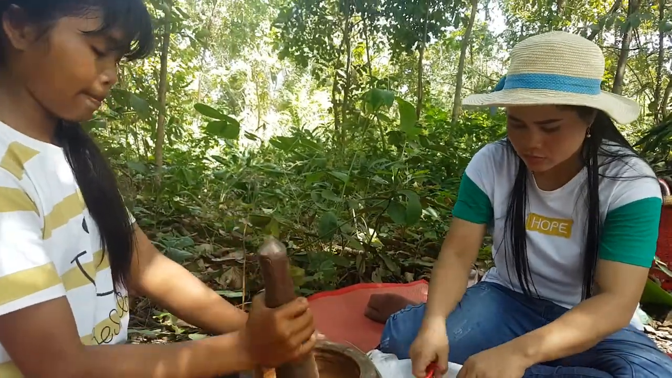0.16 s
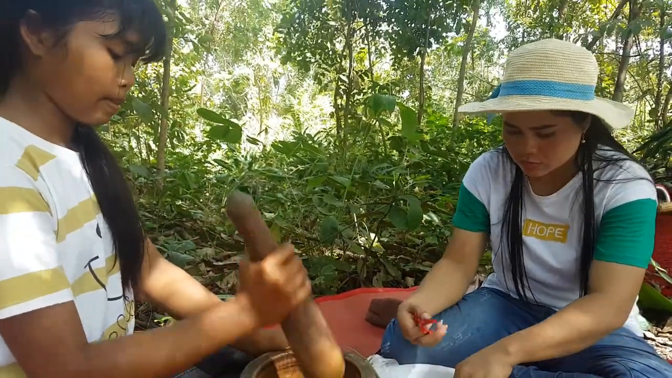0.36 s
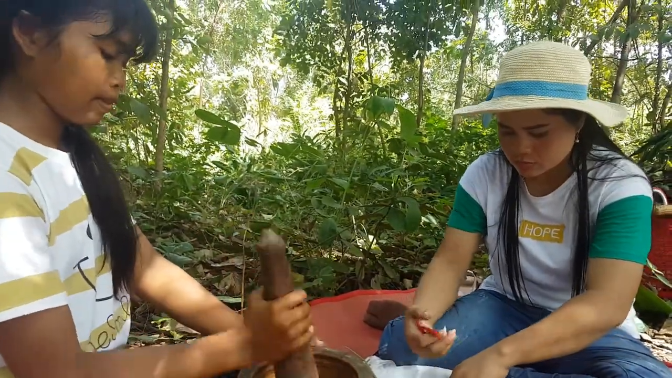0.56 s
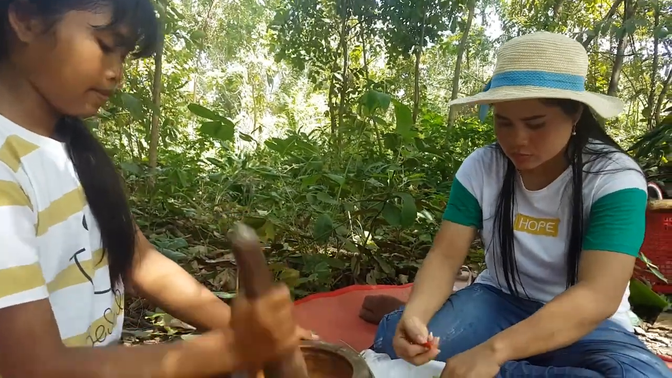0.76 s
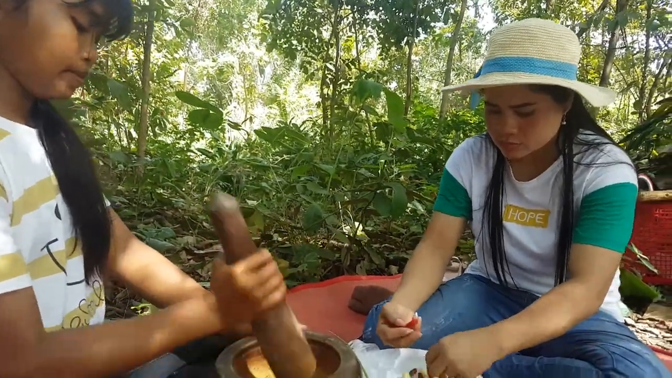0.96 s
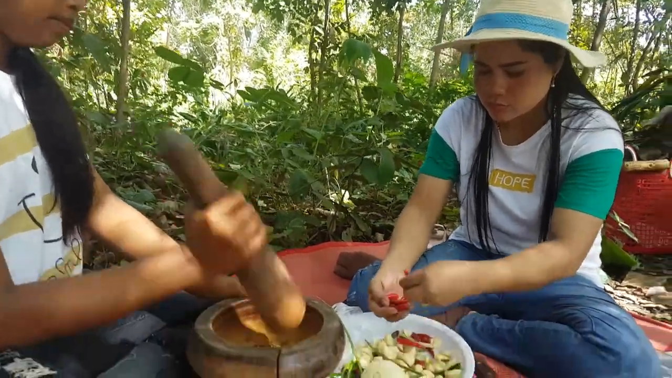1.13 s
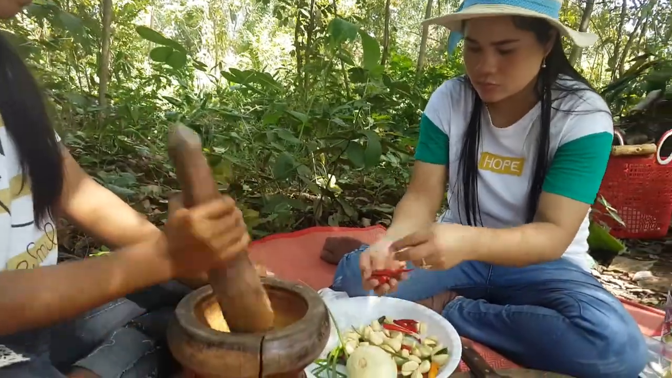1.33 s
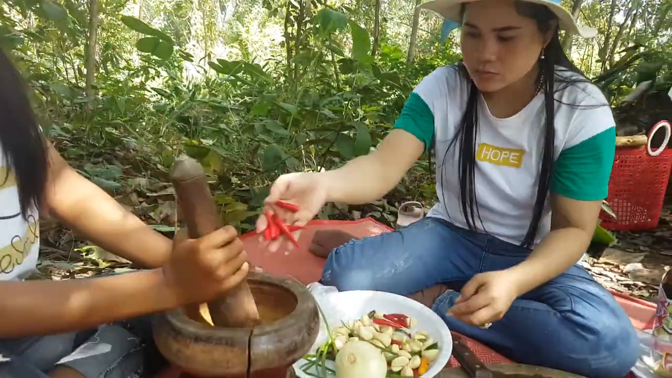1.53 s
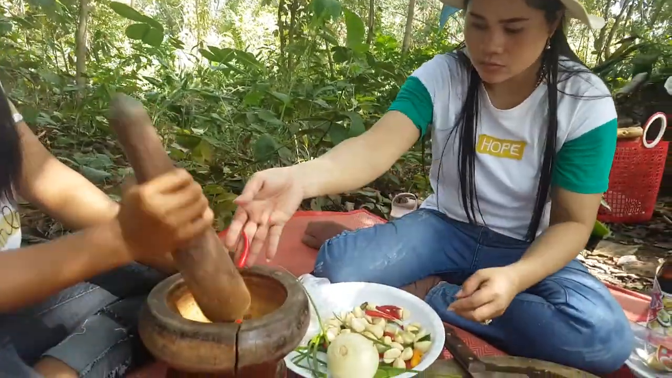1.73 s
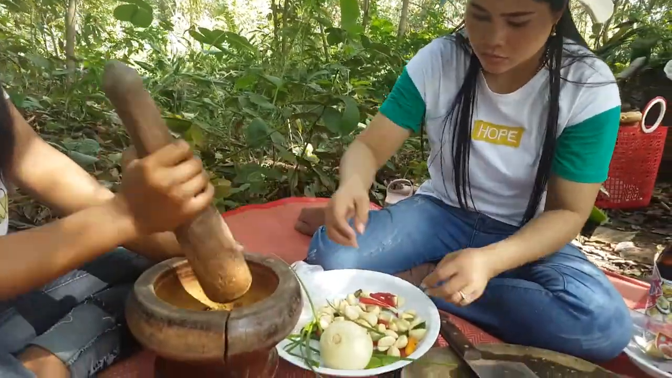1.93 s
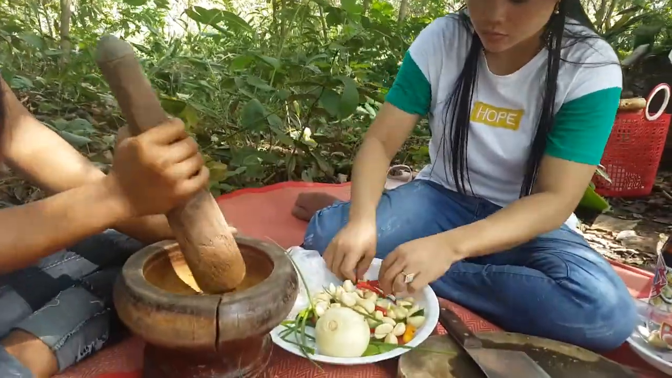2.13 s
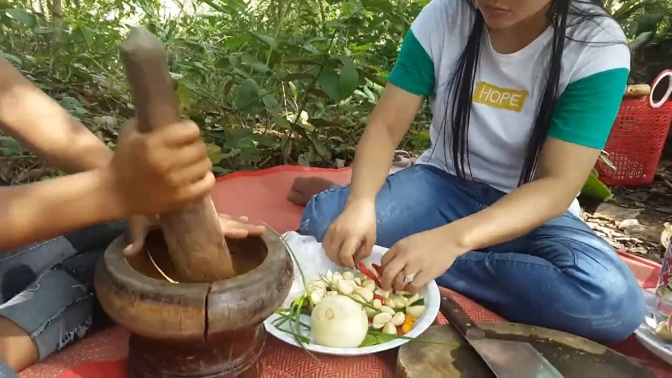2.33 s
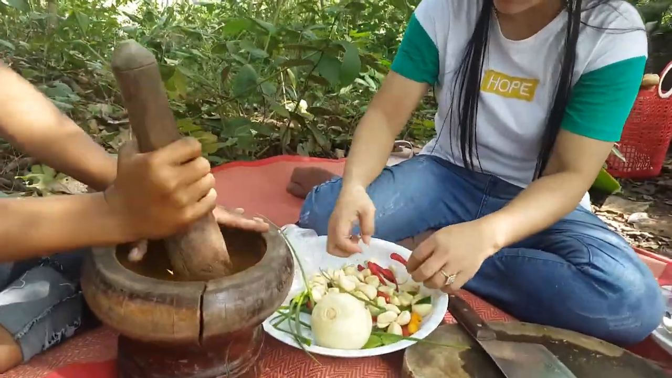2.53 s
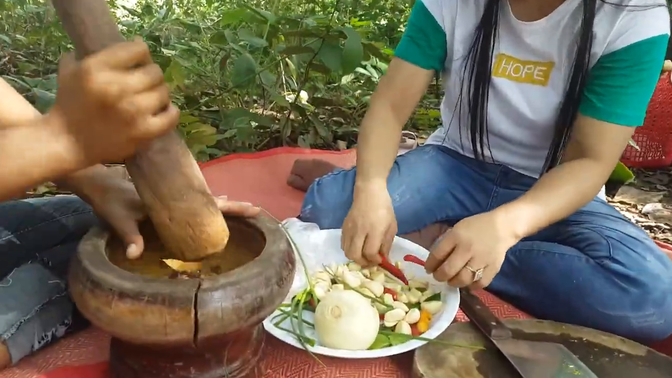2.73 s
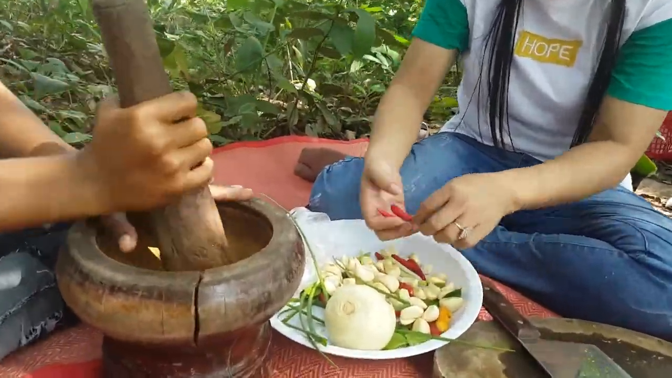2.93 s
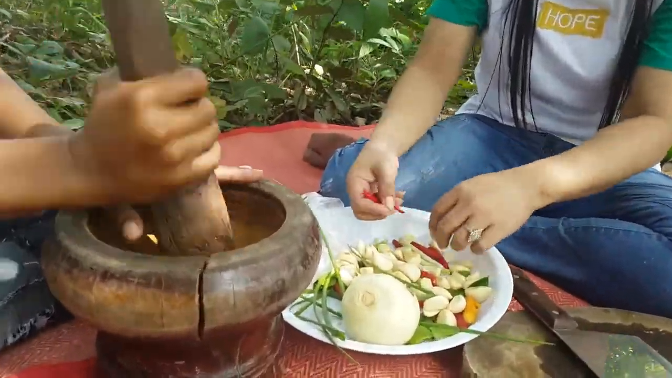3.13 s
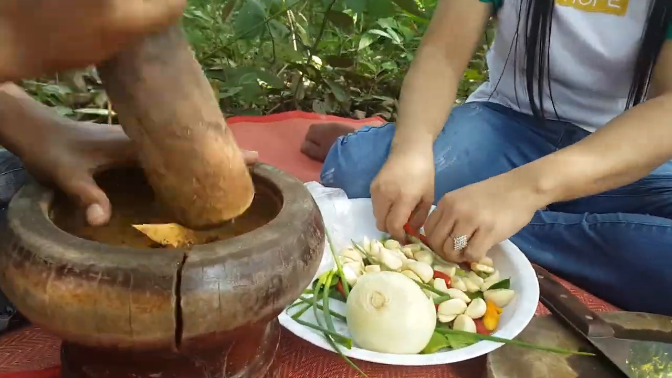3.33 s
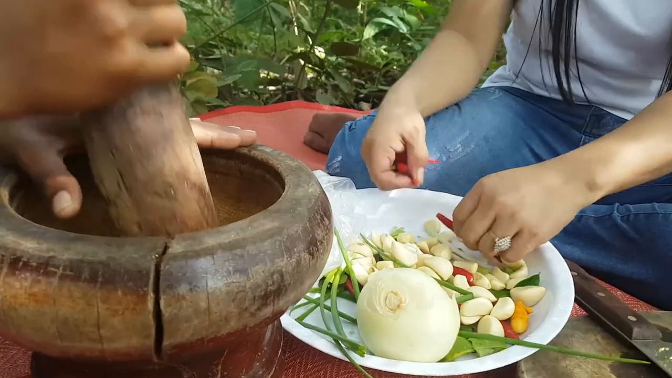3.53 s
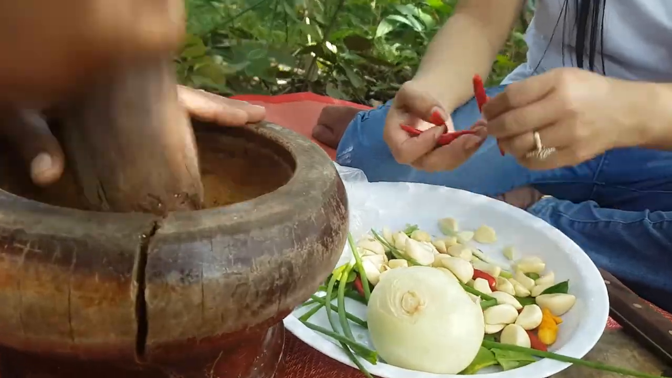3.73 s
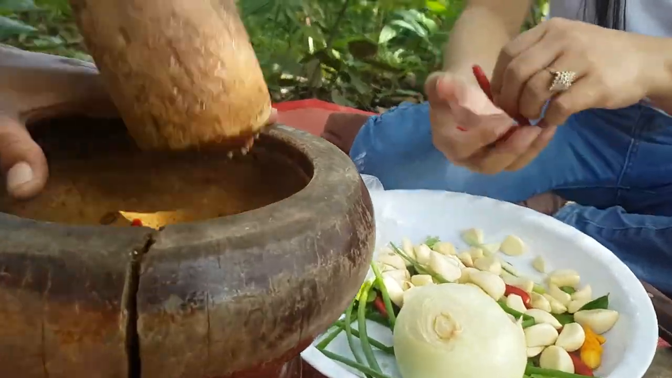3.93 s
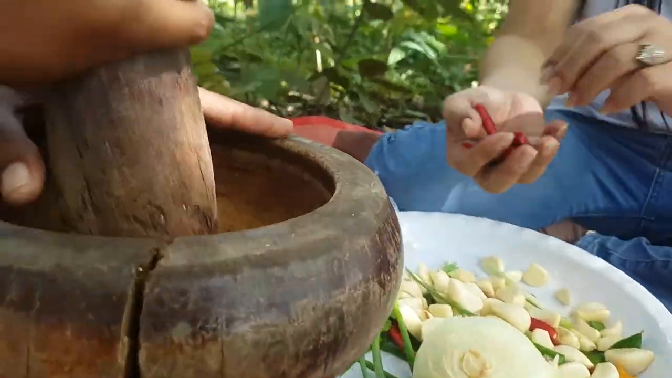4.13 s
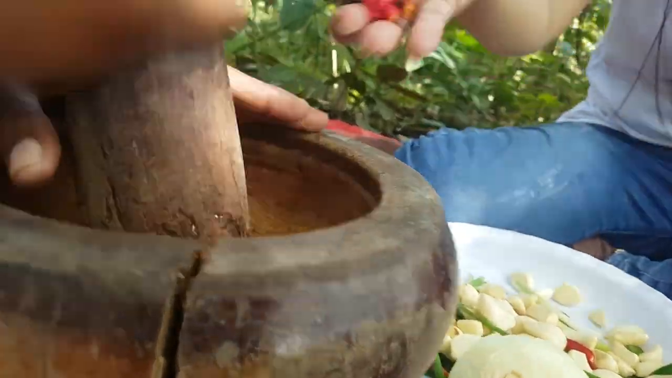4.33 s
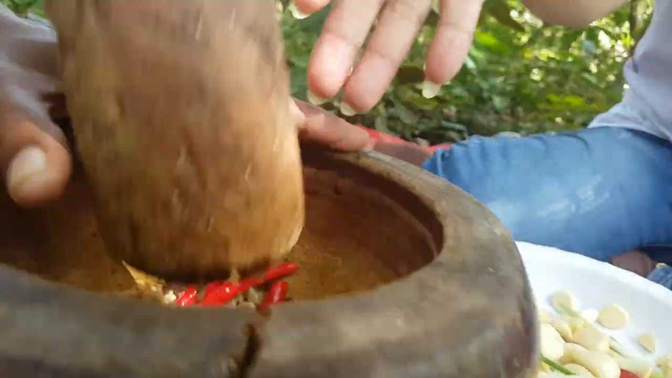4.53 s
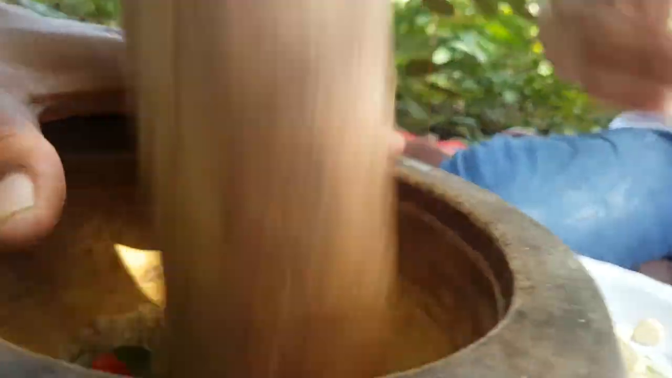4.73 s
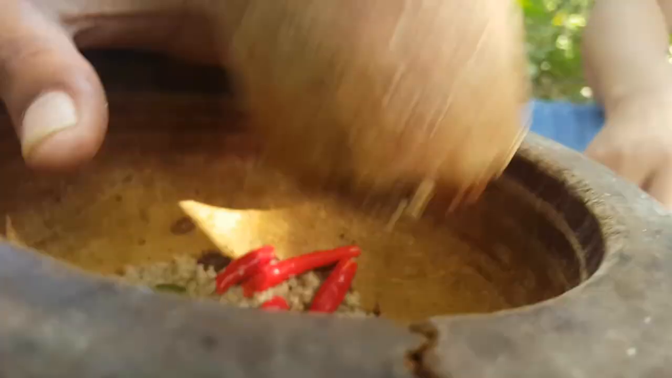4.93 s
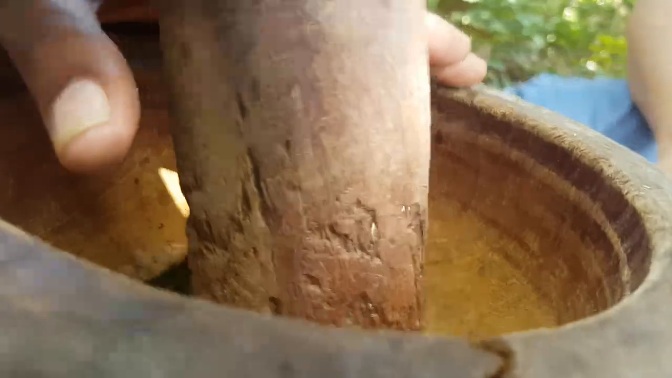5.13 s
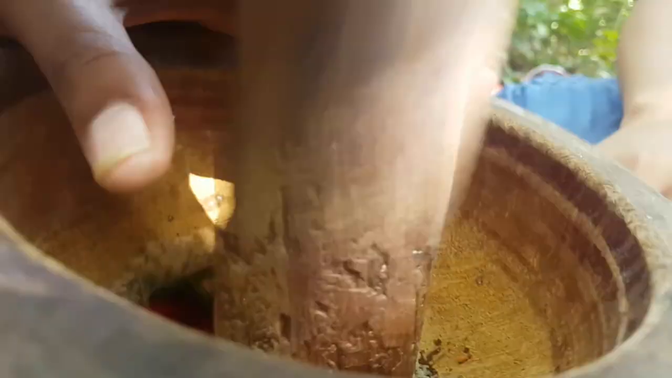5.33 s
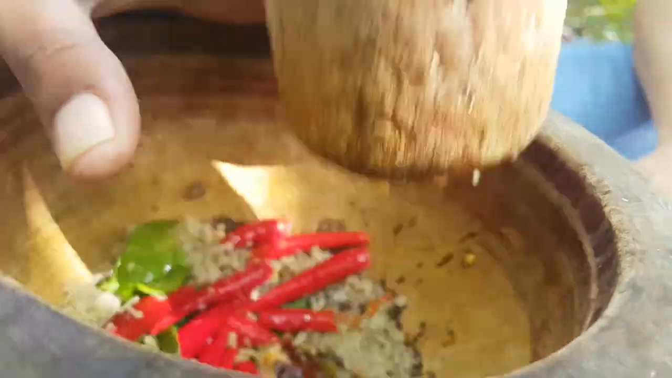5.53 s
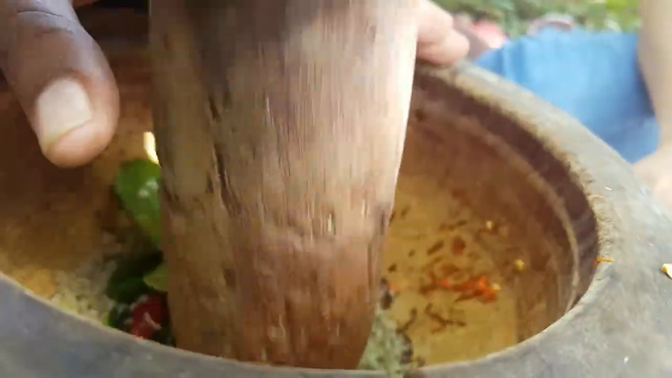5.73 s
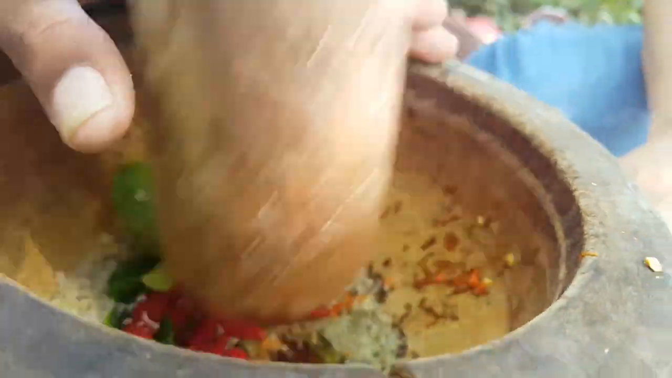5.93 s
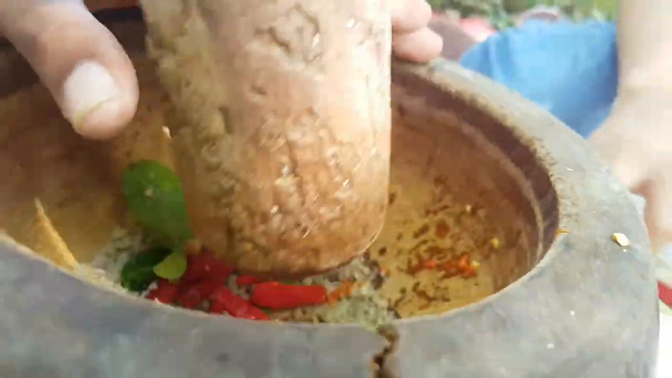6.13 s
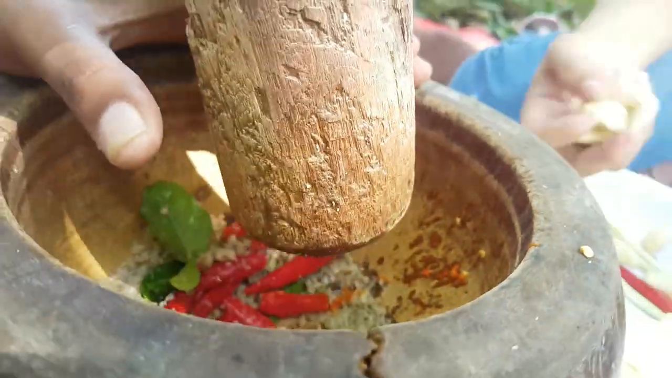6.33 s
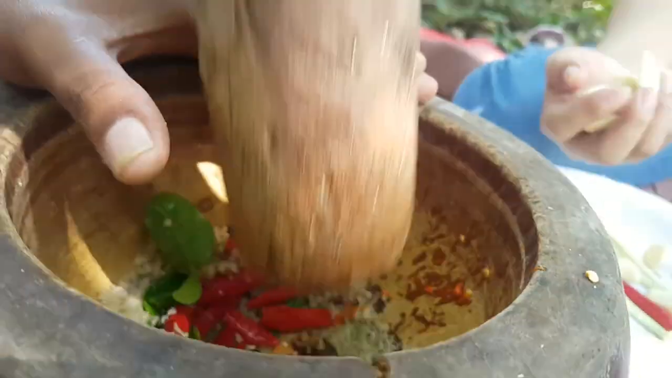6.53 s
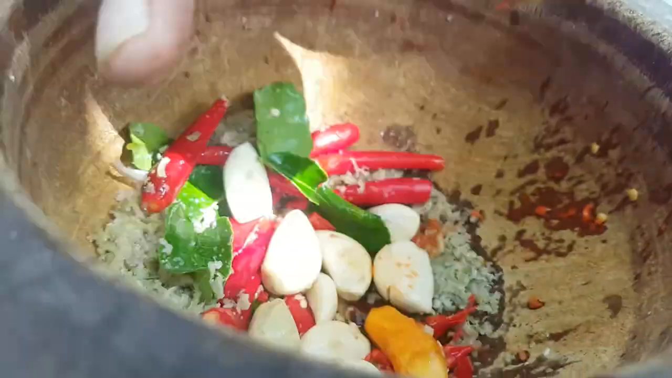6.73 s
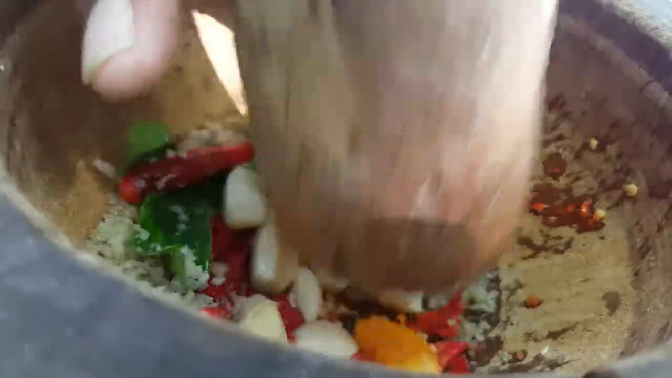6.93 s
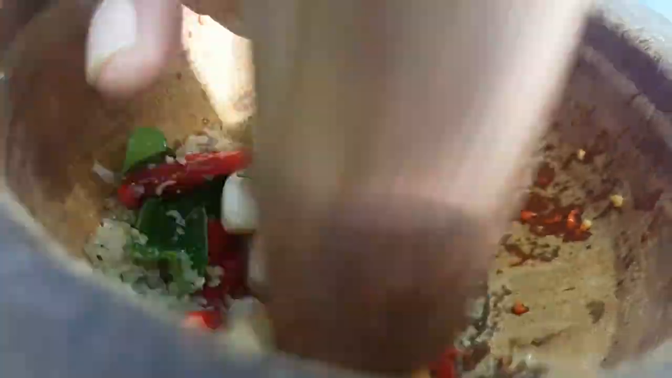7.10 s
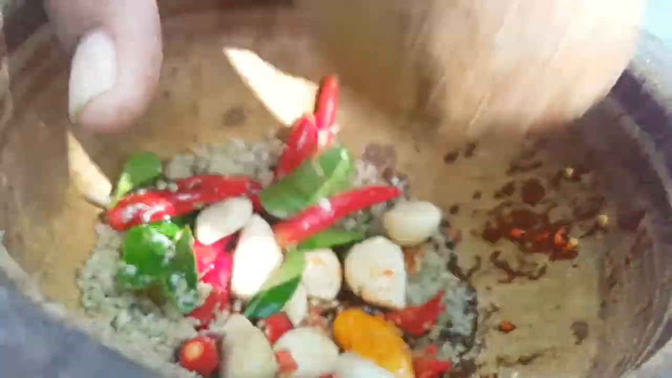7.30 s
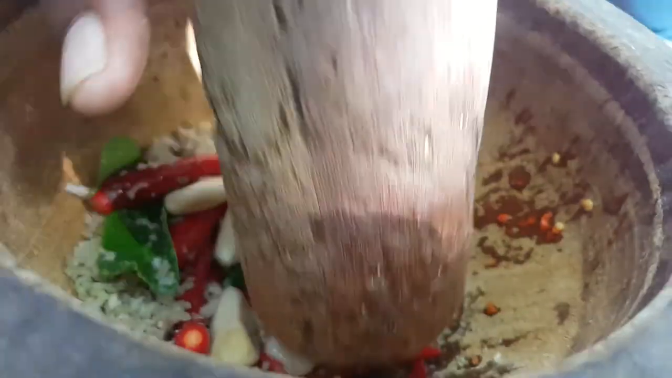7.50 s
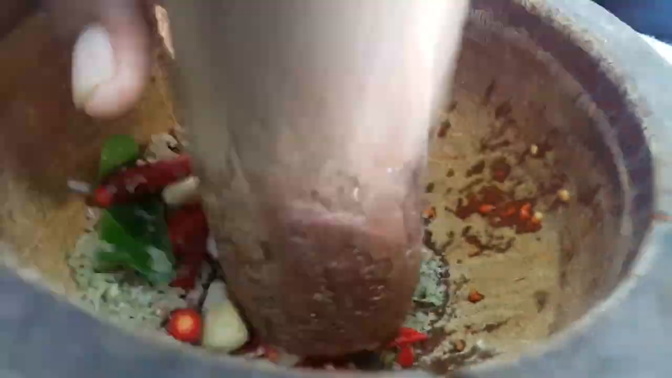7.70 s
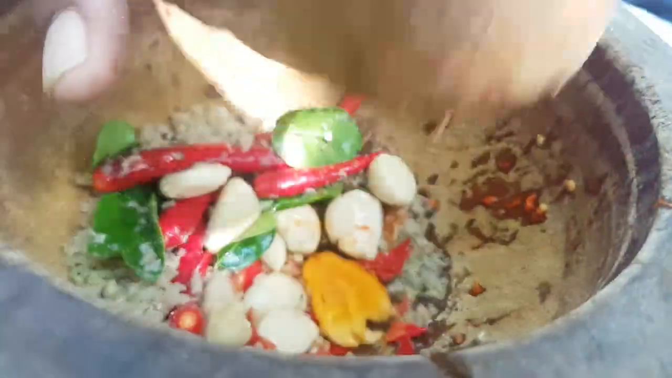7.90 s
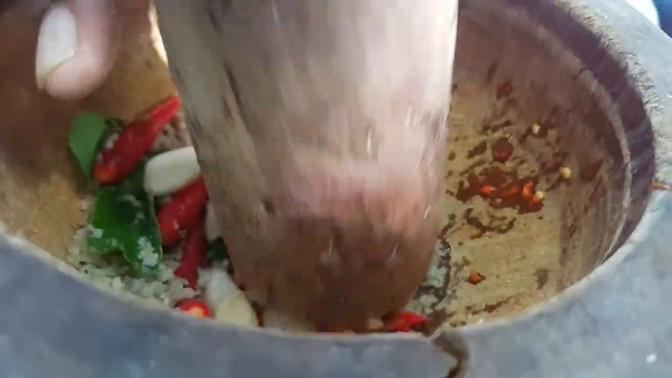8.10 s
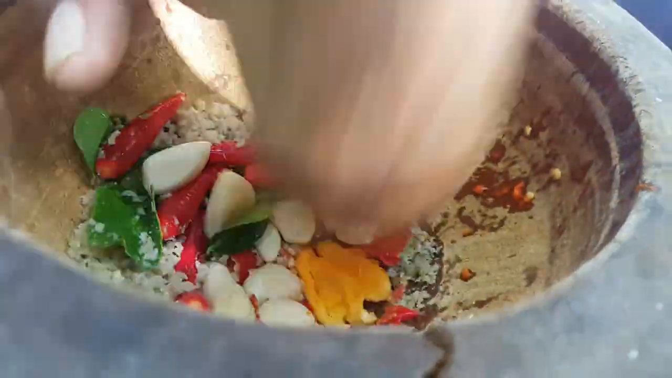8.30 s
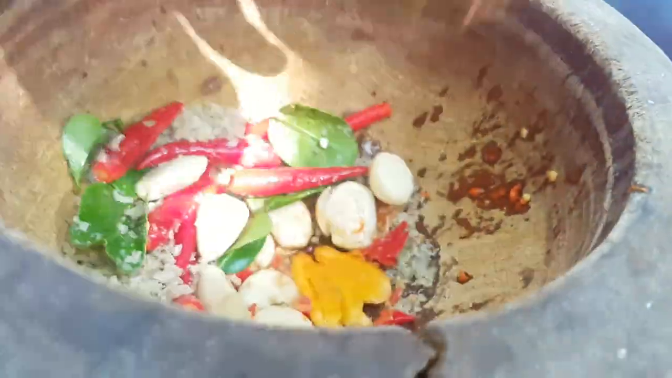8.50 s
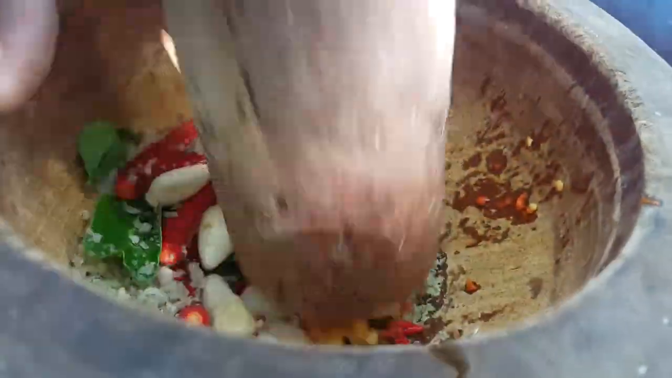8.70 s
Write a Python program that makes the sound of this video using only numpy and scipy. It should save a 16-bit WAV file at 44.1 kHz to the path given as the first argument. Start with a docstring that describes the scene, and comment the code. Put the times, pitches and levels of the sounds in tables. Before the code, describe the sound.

A wooden pestle strikes a wooden mortar outdoors, about three even blows a second. Early knocks ring hollow; as chillies and garlic collect, blows become duller, wetter and much louder. Small snaps, juicy fizzes, paste pops and rustling fill the gaps. Sharp clicks cluster at far left around five seconds; after a one-second pause, pounding resumes with a faint whirr at left. Close microphone, dry open air, low hum.

```python
"""From the start a wooden pestle pounds chillies and garlic in a wooden mortar on a mat outdoors,
about three blows a second: damped modes ring the bare bowl, noise bursts make the wet crunch. Filtered steps
give short snaps and light taps; pods fizz as noise, paste pops as rising tones. As food thickens, blows thud
and crunch; they grow louder, with sharp clicks at far left from 4.9 s, a pause after 5.7 s, and at 6.6 s a
left-hand whirr of noise and wavering tone. Throughout lie filtered-noise rustle and air, and a low hum."""
import sys
import numpy as np
from scipy import signal
from scipy.fft import rfft, irfft
from scipy.io import wavfile

SR = 44100
rng = np.random.default_rng(int(sys.argv[2]) if len(sys.argv) > 2 else 0)


def transcribe(u):
    """Save the signal u as a 16-bit wav file named by the first command-line argument.

    u: samples, shape (n,) or (channels, n), limited to [-1, 1]; the rate is SR.
    q: integer samples, one column per channel.
    """
    v = np.clip(np.atleast_2d(u).T, -1, 1)
    q = np.round(v * 32767).astype(np.int16)
    wavfile.write(sys.argv[1], SR, q)


N = 386316
TIME = np.arange(N) / SR
AGE = np.arange(SR // 4) / SR  # time since the start of one short sound, s
HIT_SPAN = .01  # levels of short sounds are rms over this many seconds


def amp(db):
    """Level: decibels become an amplitude ratio."""
    return 10 ** (np.asarray(db) / 20)


def evened(x):
    """Normalization: scales a signal to rms 1."""
    return x / np.sqrt(np.mean(x ** 2) + 1e-20)


def hit(x, db):
    """Energy level: scales a short sound by its energy over a fixed span."""
    energy = np.mean(np.sum(x ** 2, -1))
    return amp(db) * x * np.sqrt(HIT_SPAN * SR / (energy + 1e-20))


def at(s, rows):
    """Interpolation: value of a two-column time table at time s."""
    return np.interp(s, *np.transpose(rows))


def curve(rows, axis=1):
    """Interpolation: one column of a time table, for every sample."""
    rows = np.array(rows)
    return np.interp(TIME, rows[:, 0], rows[:, axis])


def colour(x, points):
    """Spectral shaping: weights each frequency by a curve of f/Hz, level/dB points."""
    hz, db = np.transpose(points)
    f = np.fft.rfftfreq(x.shape[-1], 1 / SR)
    gain = amp(np.interp(np.log(f + 1), np.log(hz), db))
    return irfft(rfft(x) * gain, x.shape[-1])


def band(x, lo_hz, hi_hz, order=2):
    """Causal band-pass: passes the frequencies between two cutoffs."""
    sos = signal.butter(order, [lo_hz, min(hi_hz, .48 * SR)], "band", fs=SR, output="sos")
    return signal.sosfilt(sos, x)


def sides(db):
    """Level-difference stereo: left and right gains of constant power."""
    return evened(amp(np.array([[db / 2], [-db / 2]])))


def noise(size, same, grain_db=0):
    """Partial coherence: two channels share part of their noise power; grain_db makes it crackly."""
    shared, own = rng.standard_normal(size), rng.standard_normal((2, size))
    grains = amp(grain_db * np.minimum(rng.exponential(1, size), 5))
    return (np.sqrt(same) * shared + np.sqrt(1 - same) * own) * grains


def drift(rate_hz):
    """Random modulation: straight lines between Gaussian knots at the given rate."""
    knots = rng.standard_normal(N // 50)
    return np.interp(TIME * rate_hz, np.arange(len(knots)), knots)


def add(mix, s, sound):
    """Superposition: mixes a sound in at time s."""
    part = mix[:, max(round(s * SR), 0):][:, :sound.shape[-1]]
    part += sound[..., :part.shape[-1]]


def random_times(per_s, chance):
    """Poisson process: exponential gaps between independent events."""
    return np.cumsum(-np.log(chance)) / per_s


# pestle blows: t/s, thud level/dB, wood ring level/dB, bowl air level/dB, crack level/dB,
# wet crunch level/dB, crushing before the pestle bottoms t/s
PESTLE_BLOWS = [(0.0822, -25, -20.5, -21, -21.5, -28.5, 0.00087), (0.4725, -24, -21.5, -15, -19, -28, 0),
                (0.8376, -30, -32, -29, -28, -33.5, 0), (1.2144, -28.5, -19.5, -16, -20.5, -28, .0005),
                (1.5835, -28.5, -21, -22, -26, -31.5, 0.0018), (1.876, -39.5, -50, -46.5, -54, -57, 0.0025),
                (2.231, -41, -46, -50, -44.5, -29.5, 0.0018), (2.542, -25.5, -35, -39.5, -37.5, -35, .0003),
                (2.8717, -28, -22.5, -15, -23, -25, 0), (3.174, -21.5, -32.5, -41.5, -34.5, -29, 0.0011),
                (3.475, -22, -27.5, -25, -35, -26.5, .0021), (3.7827, -29, -40, -66, -37.5, -22, 0.0013),
                (4.088, -35, -39, -44.5, -40.5, -33.5, 0.009), (4.378, -20.5, -15, -20.5, -28.5, -29, 0),
                (4.8, -20, -30, -38, -33, -21.5, 0.0033), (5.0968, -15, -22, -46, -30, -18, 0.0035),
                (5.3822, -14.5, -15, -25.5, -26, -20.5, 0.00029),
                (5.6698, -10.5, -16, -38, -35, -18.5, 0.0011),
                (6.8451, -8, -16, -27.5, -19.5, -23.5, 0.00093),
                (7.1553, -12, -25, -26.5, -22, -23.5, 0.0037), (7.4539, -13.5, -31, -27, -26, -20.5, 0.002),
                (7.7483, -9, -20.5, -28.5, -23.5, -22, 0), (8.055, -10.5, -41, -26.5, -24, -27, 0.0019),
                (8.3539, -9.5, -33.5, -32.5, -20, -23.5, 0.003),
                (8.6533, -10, -25.5, -44, -25, -24.5, 0.0013)]
# side on which the mortar is heard: t/s, left-right level/dB
MORTAR_PLACE = [(0, 1.5), (2.9, 3), (3.5, 4.5), (4.1, 5.5), (4.4, 7.5), (5.1, 10), (5.4, 6.5), (5.7, 6),
                (6.8, 7.5), (8.7, 5.5)]
# how thickly the food cushions the blows: t/s, thickness (0 bare wood - 1 thick)
FOOD_CUSHION = [(0, 0.071), (1.6, 0.11), (2.2, 0.18), (2.87, 0.32), (3.2, 0.34), (4.1, 0.45), (4.38, 0.93),
                (5.1, 0.57), (6.8, 0.76), (8.7, 0.58)]
# lower ring of mortar and pestle: f/Hz, level/dB on bare wood, level/dB on a cushion of food, t60/s
WOOD_MODES = [(356, -4.5, -1.5, 0.027), (409, -10.5, -10, 0.054), (486, 4.5, -10, 0.03),
              (570, -7, -12, 0.016), (650, -13, 6, 0.031), (845.4, -10, 2, 0.051)]
# upper, cracking ring: f/Hz, level/dB on bare wood, level/dB on a cushion of food, t60/s
CRACK_MODES = [(1457, 5, -9, 0.015), (2060, -4.5, -1.5, .014), (2120, -2.5, 6, 0.012), (2433, 0, 0, 0.019),
               (2820, -5, -6, 0.023), (2972, -14, -17, .05)]
# spectrum of the wet crunch: f/Hz, level/dB
WET_SPECTRUM = [(300, -8), (2000, -9), (4000, -2.5), (7000, -3), (9500, -2.5), (12300, 2.5), (14500, -7.5),
                (16000, -7)]
THUD_BARE_HZ, THUD_CUSHIONED_HZ = 248, 190.6  # nominal: a softer contact bounces more slowly
BOWL_BARE_HZ, BOWL_FILLED_HZ = 1196, 1053.4
BOWL_SETTLES = 0.16  # cushion over which the bowl's note sinks by all but 1/e of its way


def pestle(graze=0.0036):
    """Impact excitation: each blow sets off crunch, thud, wood modes and the air in the bowl."""
    out = np.zeros((2, N))
    for s, thud_db, wood_db, bowl_db, crack_db, wet_db, lead in PESTLE_BLOWS:
        side_db = at(s, MORTAR_PLACE)
        place = sides(side_db)
        cushion = at(s, FOOD_CUSHION)

        thud_hz = THUD_BARE_HZ + cushion * (THUD_CUSHIONED_HZ - THUD_BARE_HZ)
        contact = amp(9.5) * ring(330, 0.0066)
        wood = band(strike(WOOD_MODES, cushion) + contact, 270, 3300)
        add(out, s, place * (hit(thud(thud_hz), thud_db) + hit(wood, wood_db)))

        # the air of the bowl radiates upward, more evenly to both sides
        bowl_hz = BOWL_FILLED_HZ + (BOWL_BARE_HZ - BOWL_FILLED_HZ) * np.exp(-cushion / BOWL_SETTLES)
        bowl = ring(bowl_hz, 0.044) + amp(-0.5) * ring(1.02 * bowl_hz, 0.016)
        add(out, s, -sides(0.48 * side_db) * hit(bowl, bowl_db))

        # the thicker the food lies, the brighter its crunch and the less clean ring is left
        clean = .6 * (1 - cushion)  # share of the crack's power
        add(out, s, place * hit(strike(CRACK_MODES, cushion), crack_db) * np.sqrt(clean))
        cells = crush(0.00042, fall=.0014 + 0.1 * lead, tail_db=-4.5 - 29 * cushion,
                      tail_s=0.0089, same=0.66, grain_db=-0.5)
        crunch = band(cells, 1690, 2800 + 1300 * cushion, order=3)
        add(out, s - lead, place * hit(crunch, crack_db) * np.sqrt(1 - clean))

        juice = crush(graze + .5 * lead, fall=0.0031, tail_db=-19.5, tail_s=0.022, same=0.16, grain_db=6.0)
        wet = colour(juice, WET_SPECTRUM)
        add(out, s - lead - graze, place * hit(wet, wet_db))
    return out


def thud(hz, length=0.0056, rise=0.00063, stiff=0.88, relax=.0022):
    """Mass on a spring: the heavy mortar bounces on the mat, slowing as the contact relaxes."""
    turns = np.cumsum(hz * (0.75 + stiff * np.exp(-AGE / relax))) / SR
    envelope = (1 - np.exp(-AGE / rise)) * np.exp(-(AGE / length) ** 2)
    bounce = np.sin(2 * np.pi * turns) * envelope
    rocking = amp(-31) * ring(200, .06)
    return band(bounce + rocking, 50, 3000)


def strike(modes, cushion=0.14, detune=0.021):
    """Modal synthesis: food shifts the balance of the modes, and each blow lands on another spot."""
    spot_db = 2.5 * rng.standard_normal(len(modes))
    total = 0
    for (hz, bare_db, soft_db, t60), luck_db in zip(modes, spot_db):
        level_db = bare_db + cushion * (soft_db - bare_db) + luck_db
        total = total + amp(level_db) * ring(hz * (1 + detune * rng.normal()), t60)
    return total


def ring(hz, t60):
    """Damped oscillation: one mode falls by 60 dB in t60 seconds."""
    return np.sin(2 * np.pi * hz * AGE) * amp(-60 * AGE / t60)


def crush(lead, fall, tail_db, tail_s, same, grain_db):
    """Fracture noise: it grows while the pestle sinks in, then decays fast with a longer tail."""
    after = np.maximum(AGE - lead, 0)
    growth = np.minimum(AGE / (lead + 1e-4), 1)
    decay = np.exp(-after / fall) + amp(tail_db) * np.exp(-after / tail_s)
    return growth * decay * noise(len(AGE), same, grain_db)


# the louder air pockets popping in the paste: t/s, level/dB (the cavity itself 1 dB less), f/Hz at onset
PASTE_POPS = [(0.646, -46.5, 630), (0.679, -46.5, 1270), (0.946, -45, 1610), (1.035, -49, 600),
              (1.073, -48, 1020), (1.137, -43.5, 1110), (2.423, -49, 1100), (2.702, -39.5, 1020),
              (2.818, -50.5, 1020), (5.215, -34.5, 720), (6.163, -52.5, 830), (6.225, -49, 875),
              (6.387, -39, 888), (6.396, -47.5, 900), (6.483, -45, 877), (7.404, -28, 830),
              (7.708, -36.5, 880), (7.863, -38.5, 760), (8.338, -31, 960)]
POP_SIDE_DB = -1  # left-right
POP_TICK_DB = -9.5  # the sticky film parts with a tick, relative to the table's level
FAINT_POPS_PER_S, FAINT_POP_DB, FAINT_POP_HZ = 6, -59.5, 820  # mean rate, middle level and pitch


def pops():
    """Cavity resonance: air pockets open in the paste with a tick and ring briefly, rising in pitch."""
    out = np.zeros((2, N))
    chance = rng.random(size=(70, 3))
    times = random_times(FAINT_POPS_PER_S, chance[:, 0])
    faint = [(s, FAINT_POP_DB + 10 * (loud - .5), FAINT_POP_HZ * 1.45 ** (high - .5))
             for s, (_, loud, high) in zip(times, chance)]
    tick = band(np.exp(-AGE / .0001), 440, 2800, order=1)
    for s, db, hz in PASTE_POPS + faint:
        cavity = ring(hz * (1 + 6 * AGE), .011) * (1 - np.exp(-AGE / .0007))
        wood = amp(-29) * strike(WOOD_MODES + CRACK_MODES)
        pop = hit(cavity + wood, db - 1.0) + hit(tick, db + POP_TICK_DB)
        add(out, s - .001, sides(POP_SIDE_DB) * pop)
    return out


# juicy pods tearing or bursting: t/s, level/dB, hold at full strength t/s, t60/s, share of thin fizz (0-1)
POD_SPRAYS = [(0.591, -18, 0.0032, 0.028, 0.88), (.604, -16.5, 0.0024, 0.0093, 0.42),
              (.608, -33, .012, 0.29, 0.71), (3.759, -19.5, 0.024, 0.17, 0.64),
              (4.08, -36, 0.014, 0.024, 0), (8.3353, -23.5, 0.0017, 0.038, 0.8)]
# spectrum of the thin, high fizz: f/Hz, level/dB
FIZZ_SPECTRUM = [(300, -42), (3000, -27), (7000, -8), (9500, -1), (12500, 5), (15000, -3), (16000, -10)]


def sprays():
    """Random burst superposition: a pod gives way in a dense fizz of bursting cells."""
    out = np.zeros((2, N))
    for s, db, hold, t60, thin in POD_SPRAYS:
        cells = noise(len(AGE), 0.089, grain_db=4) * amp(1.8 * drift(246)[:len(AGE)])
        fizz = evened((1 - thin) * colour(cells, WET_SPECTRUM) + thin * colour(cells, FIZZ_SPECTRUM))
        rise = np.minimum(AGE / 0.0024, 1)
        decay = amp(-60 * np.maximum(AGE - hold, 0) / t60)
        add(out, s, amp(db) * fizz * rise * decay)
    return out


def surroundings(x, t60=0.069):
    """Diffuse scattering: faint decaying reflections from the ground, the sitters and the undergrowth."""
    decay = amp(-60 * AGE / t60) * (AGE > .004)
    tail = band(noise(len(AGE), 0.45), 290, 6300, order=1) * decay
    return signal.fftconvolve(x, tail / np.linalg.norm(tail[0]), axes=1)[:, :N]


# short snaps and light taps, some far left: t/s, splinter level/dB, body level/dB relative to it,
# left-right level/dB
SNAPS_AND_TAPS = [(0.178, -43, -7, 6), (0.7683, -41, -7.5, 2), (0.9072, -44, -23, -4),
                  (1.0463, -44, -4.5, -2), (1.5048, -45.5, -40, -12.5), (1.5265, -46, -22, -4),
                  (1.7357, -42.5, -25, 0), (3.365, -61, 11, 0.5), (3.386, -53.5, 7.5, 1),
                  (3.7372, -37, -30, -3), (3.7561, -21, -22, -7), (3.946, -42, -30.5, 19.5),
                  (4.645, -43.5, -11, 18), (5.3101, -42, -10, 29), (5.717, -25.5, -26, 10),
                  (5.889, -34.5, -20, 2.5), (5.9356, -35, -23, 7), (5.9595, -41, -34, 1),
                  (6.004, -43.5, -23, -1), (6.048, -46.5, -26, -1), (6.292, -46.5, -10.5, 5),
                  (7.3758, -48, 8, -12), (7.674, -42, -7, -8), (8.47, -43.5, -1, -5)]
# how busy the hands are, the bed under leaves, cloth and paste alike: t/s, level/dB
HAND_BUSTLE = [(0, -54.5), (1.6, -57.5), (2.5, -61.5), (3.5, -61), (4.3, -65.5), (5.5, -58.5), (6.7, -61.5),
               (8.76, -61.5)]
SNAP_BUMP_DB = -9.5  # the low bump, relative to the body
# the faint ones come at random: mean rate, middle level above the bustle, body relative to splinter
FAINT_SNAPS_PER_S, FAINT_SNAP_DB, FAINT_SNAP_BODY_DB = 6, 5, -10


def snaps_and_taps():
    """Transient excitation: short snaps and light taps, some far left, the faint ones at random."""
    out = np.zeros((2, N))
    chance = rng.random(size=(80, 3))
    times = random_times(FAINT_SNAPS_PER_S, chance[:, 0])
    faint = [(s, at(s, HAND_BUSTLE) + FAINT_SNAP_DB + 10 * (loud - .5), FAINT_SNAP_BODY_DB, 10 * (place - .5))
             for s, (_, loud, place) in zip(times, chance)]
    for s, db, body_db, side_db in SNAPS_AND_TAPS + faint:
        add(out, s, sides(side_db) * click(db + body_db + SNAP_BUMP_DB, db + body_db, db))
    return out


def click(bump_db, snap_db, splinter_db):
    """Broadband transient: a sharp step splits into a dull bump, a snap and a bright splinter."""
    step = np.exp(-AGE / .00005)
    decay = np.exp(-AGE / 0.00097) + amp(-8.5) * np.exp(-AGE / 0.0043)
    splinter = step + 0.32 * noise(len(AGE), 0.18, grain_db=6.0) * decay
    bump = hit(band(step, 83, 464), bump_db)
    snap = hit(band(step, 330, 1610, order=1), snap_db)
    return bump + snap + hit(band(splinter, 2800, 13900, order=1), splinter_db)


# sharp clicks at far left: t/s, bump level/dB, snap level/dB, splinter level/dB
LEFT_CLICKS = [(4.8844, -39, -23.5, -40), (4.9015, -30, -27, -24), (4.9934, -33, -38, -32),
               (5.1449, -36, -41, -28.5), (5.1763, -25, -31.5, -27), (5.1996, -25, -33.5, -33),
               (5.2254, -32.5, -35, -36.5), (5.3647, -24.5, -32.5, -40), (5.376, -47.5, -27, -20),
               (5.4845, -35, -34.5, -29), (5.5088, -39.5, -39.5, -57), (5.5476, -45, -41, -60),
               (5.6154, -43, -43.5, -60), (6.2577, -53, -30.5, -65), (6.6298, -27, -43, -55),
               (7.5464, -35.5, -52, -71)]
LEFT_CLICK_SIDE_DB = 34.5  # left-right


def left_clicks():
    """Interaural level difference: sharp clicks are heard almost wholly at the left."""
    out = np.zeros((2, N))
    for s, *levels_db in LEFT_CLICKS:
        add(out, s, sides(LEFT_CLICK_SIDE_DB) * click(*levels_db))
    return out


# handfuls of leaves and pods rustling: start t/s, length t/s, level/dB
LEAF_STROKES = [(0.85, 0.15, -49.5), (4.95, 0.13, -49.5), (6.84, .32, -40.5), (7.12, 0.51, -53),
                (7.55, .46, -51.5)]
# sleeves and hands rubbing: start t/s, length t/s, level/dB
CLOTH_STROKES = [(0.02, 0.14, -47.5), (0.16, 0.12, -48.5), (0.74, 0.087, -49), (0.89, .09, -67),
                 (1.5, 0.19, -55), (1.92, 0.27, -61), (5.19, .1, -51), (5.49, 0.1, -52.5)]
# the pestle smearing the paste between blows: start t/s, length t/s, level/dB
PASTE_STROKES = [(0.16, 0.3, -61.5), (4.49, .13, -55), (5.08, .2, -47.5), (5.46, 0.4, -53.5),
                 (6.35, 0.34, -58.5), (6.9, .22, -60.5), (7.36, .09, -50), (7.66, 0.15, -47),
                 (7.8, .2, -46), (8.48, .15, -50.5)]
# spectrum of the leaves: f/Hz, level/dB
LEAF_SPECTRUM = [(500, -8), (1200, -8), (3000, -4), (6000, -6), (9000, -5), (12500, 0), (14500, -7),
                 (16000, -10.5)]
# spectrum of the cloth: f/Hz, level/dB
CLOTH_SPECTRUM = [(200, -19.5), (700, -2), (1500, -1.5), (2500, -2.5), (4500, -5), (7000, -6.5),
                  (16000, -22.5)]
# spectrum of the paste: f/Hz, level/dB
PASTE_SPECTRUM = [(150, -18), (450, 0), (900, -2), (1300, -5.5), (2000, -14), (3000, -16.5), (6000, -22.5),
                  (16000, -40.5)]
CLOTH_BED_DB, PASTE_BED_DB = -10.5, -6  # relative to the leaves
CRACKLE_DB = -3  # sparse tiny breaks, relative to the fine grain of the leaves


def rustle():
    """Friction noise: fine crackle of leaves, rubbing of cloth, and the lumpy smear of paste."""
    flutter = amp(1.5 * drift(70) + 1.5 * drift(18))
    lumps = amp(4.5 * drift(150))
    grains = evened(noise(N, .12, grain_db=3) * flutter) + amp(CRACKLE_DB) * crackle()
    leaves = evened(colour(grains, LEAF_SPECTRUM))
    rubbing = noise(N, 0.4, grain_db=5.5) * amp(3.8 * drift(96))
    cloth = evened(colour(rubbing, CLOTH_SPECTRUM))
    paste = evened(colour(noise(N, 0.19, grain_db=5) * lumps, PASTE_SPECTRUM))
    bed = amp(curve(HAND_BUSTLE))
    # bed and strokes add in power
    return (np.hypot(bed, strokes(LEAF_STROKES)) * leaves
            + np.hypot(amp(CLOTH_BED_DB) * bed, strokes(CLOTH_STROKES)) * cloth
            + np.hypot(amp(PASTE_BED_DB) * bed, strokes(PASTE_STROKES)) * paste)


def crackle(per_s=55, size_db=3.5, length=0.0029):
    """Shot noise: sparse tiny breaks of uneven size, each a short burst."""
    breaks = (rng.random(N) < per_s / SR) * amp(size_db * np.minimum(rng.exponential(1, N), 3))
    burst = noise(len(AGE), .3) * np.exp(-AGE / length)
    return evened(signal.oaconvolve(breaks[None], burst, axes=1)[:, :N])


STROKE_PEAK = 0.43  # every stroke swells until this share of its length, then fades


def strokes(rows):
    """Amplitude envelope: strokes that each swell and fade in one sine arch."""
    total = 0
    for s, length, db in rows:
        phase = np.interp(TIME, [s, s + STROKE_PEAK * length, s + length], [0, .5, 1])
        total = total + amp(db) * np.sin(np.pi * phase)
    return total


# faint whirr with a wavering tone: t/s, level/dB, centre of the tone f/Hz
WHIRR_COURSE = [(6.6, -48, 467), (7.06, -52, 424.6), (7.24, -49, 468), (7.36, -49, 438), (7.58, -49, 495),
                (7.63, -46, 413.5), (7.95, -55, 450), (8.05, -57, 448), (8.76, -55, 461.5)]
# spectrum of the whirr: f/Hz, level/dB
WHIRR_SPECTRUM = [(60, -0.5), (200, 0.5), (450, -1.5), (700, -12), (1000, -8), (1500, -12.5), (2500, -2.5),
                  (3200, -7), (4200, -20.5), (8000, -36), (16000, -49)]
# the tone swells now and then: start t/s, length t/s, level/dB
WHIRR_SWELLS = [(7.23, .14, -46), (7.48, .22, -48), (7.83, .16, -51)]
WHIRR_TONE_DB, WHIRR_WAVER = -7, .007  # tone relative to the whirr; wavering as a share of its pitch


def whirr(start=6.57):
    """Frequency modulation: a soft whirr with a wavering, swelling tone sets in at the left."""
    running = np.clip((TIME - start) / .02, 0, 1)
    level = running * amp(curve(WHIRR_COURSE))
    hiss = evened(colour(noise(N, .1), WHIRR_SPECTRUM))
    tone_hz = curve(WHIRR_COURSE, axis=2) * (1 + WHIRR_WAVER * drift(40))
    tone = np.sin(2 * np.pi * np.cumsum(tone_hz) / SR) * amp(2 * drift(4.9))
    tone_level = np.hypot(amp(WHIRR_TONE_DB) * level, strokes(WHIRR_SWELLS))
    return sides(16.3) * (level * hiss + tone_level * tone)


# spectrum of the open air: f/Hz, level/dB
AIR_SPECTRUM = [(20, -26), (45, -16), (65, -12.5), (85, 6), (108, 7.5), (135, -2), (200, -3.5), (280, -7.5),
                (600, -21), (1100, -28.5), (1700, -28.5), (4000, -32.5), (16000, -56)]
# lines of the low hum, about which they waver: f/Hz, level/dB
HUM_LINES = [(84, -61.5), (108, -63), (202, -66.5)]


def outdoors():
    """Stationary noise and line spectrum: still air with a faint, wavering low hum."""
    air = evened(colour(noise(N, .9), AIR_SPECTRUM))
    hum = 0
    for hz, db in HUM_LINES:
        turns = np.cumsum(hz + 3 * drift(9.6)) / SR
        hum = hum + amp(db + 2 * drift(1.6)) * np.sin(2 * np.pi * turns)
    return amp(-58.0) * air + hum


def scene():
    """Linear superposition: the mortar and its food, the snaps, clicks and whirr, and the open air."""
    work = pestle() + pops() + sprays()
    near = work + amp(-18.5) * surroundings(work) + snaps_and_taps() + rustle()
    return near + left_clicks() + whirr() + outdoors()


# spectral tilt between the channels, applied to the left: f/Hz, left-right level/dB
LEFT_TILT = [(20, -2.5), (2000, 0.5), (5000, -1), (8000, -7.5), (12000, -9.5), (16000, -8)]
EDGE_HZ = 16200  # low-pass cutoff


def record(dry):
    """Saturation and band limit: the left is duller in the treble; peaks stop at full scale first."""
    held = np.clip([colour(dry[0], LEFT_TILT), dry[1]], -1, 1)
    low_pass = signal.firwin(255, EDGE_HZ, window=("kaiser", 8), fs=SR)
    return signal.oaconvolve(held, low_pass[None], "same")


dry = scene()
out = record(dry)
transcribe(out)
```